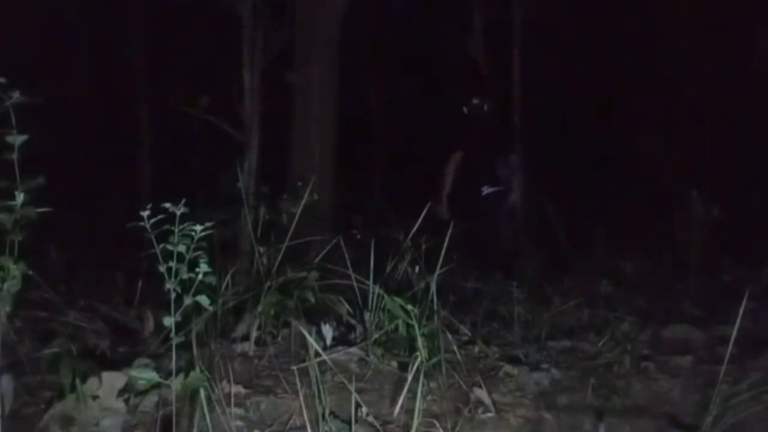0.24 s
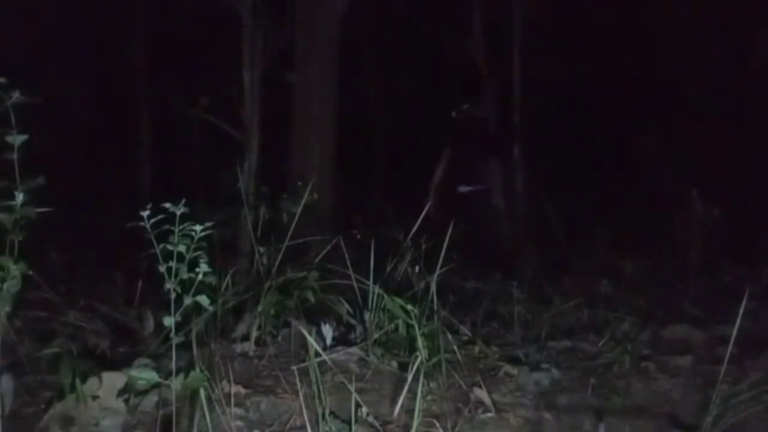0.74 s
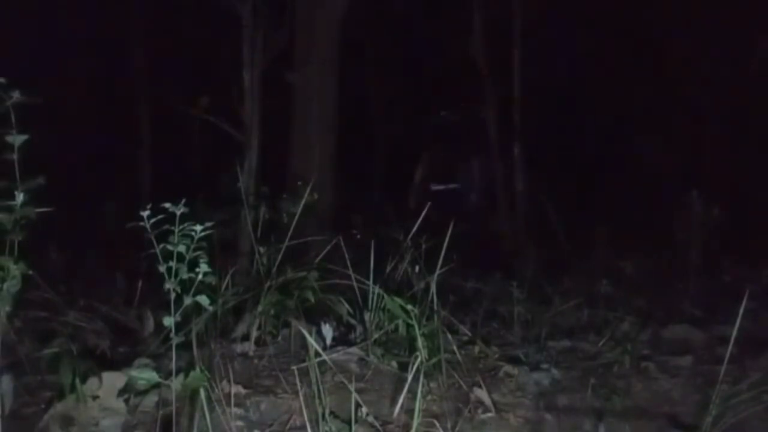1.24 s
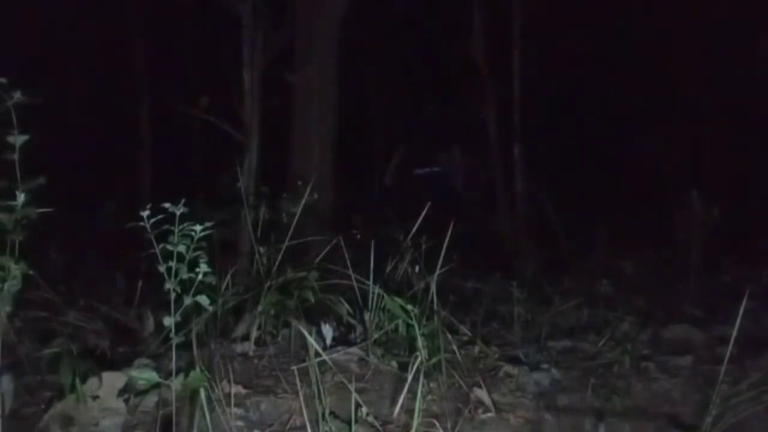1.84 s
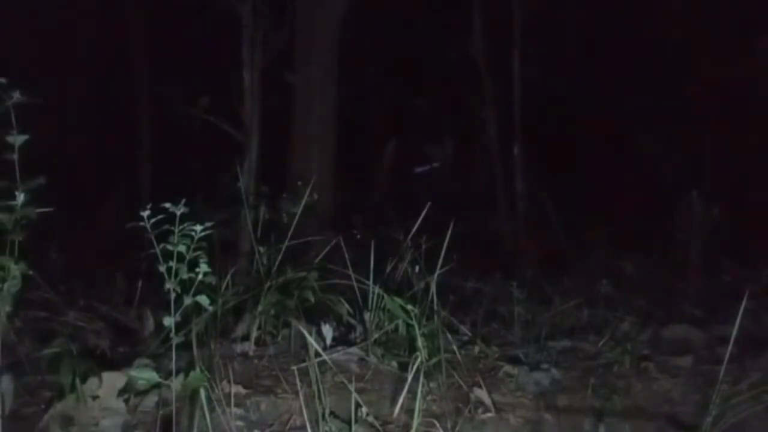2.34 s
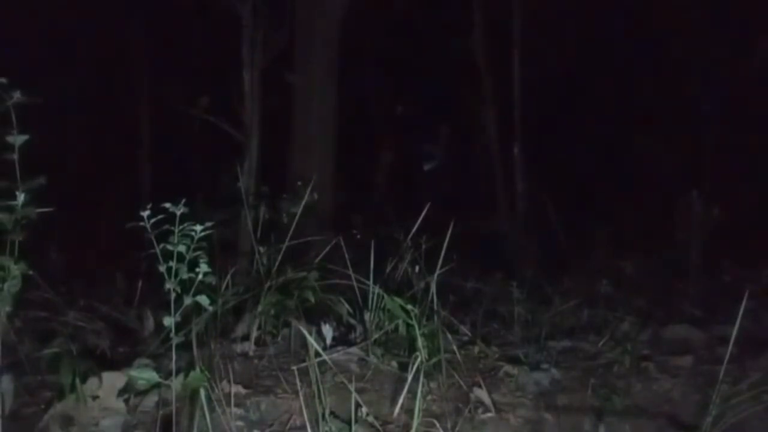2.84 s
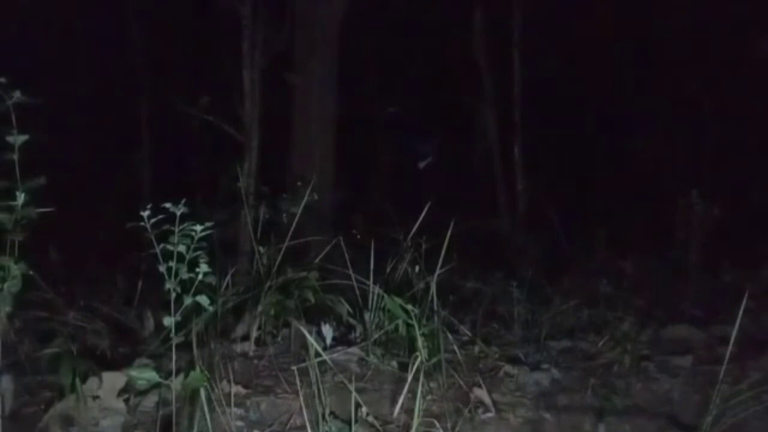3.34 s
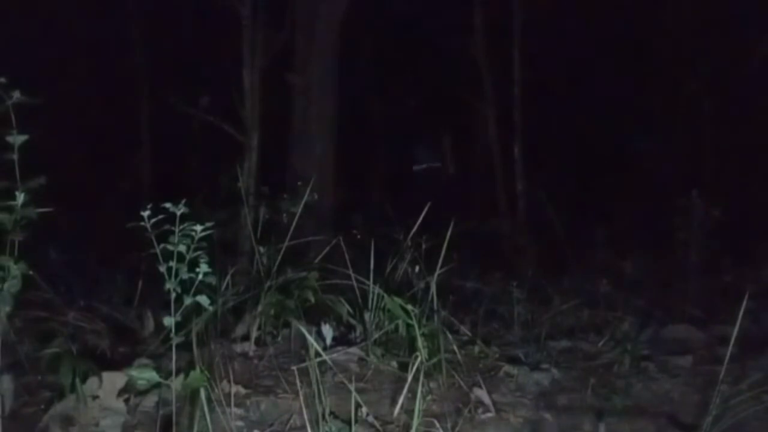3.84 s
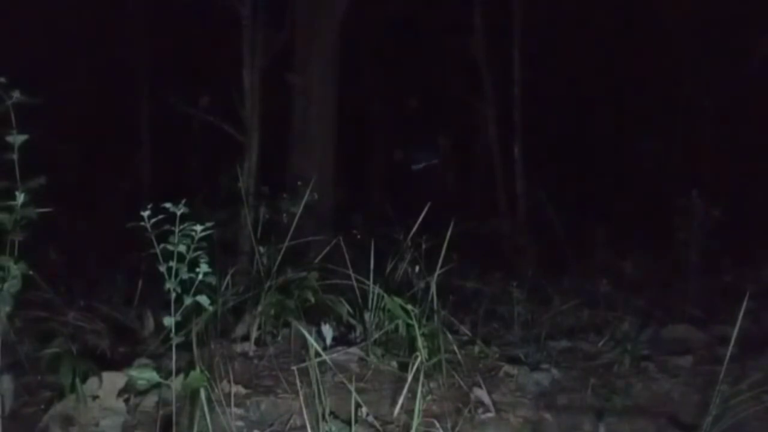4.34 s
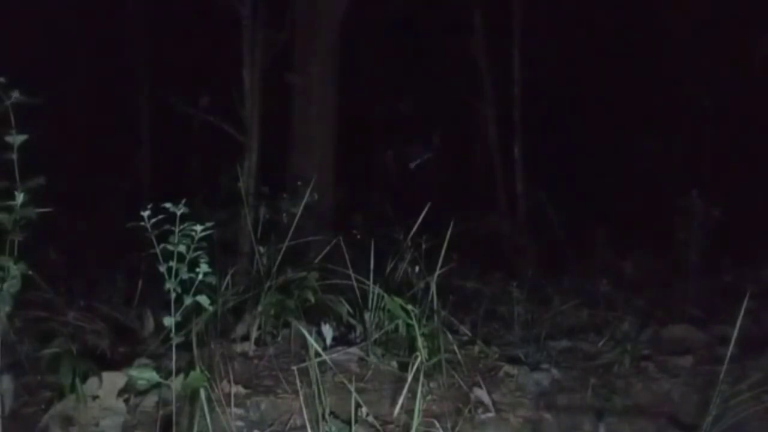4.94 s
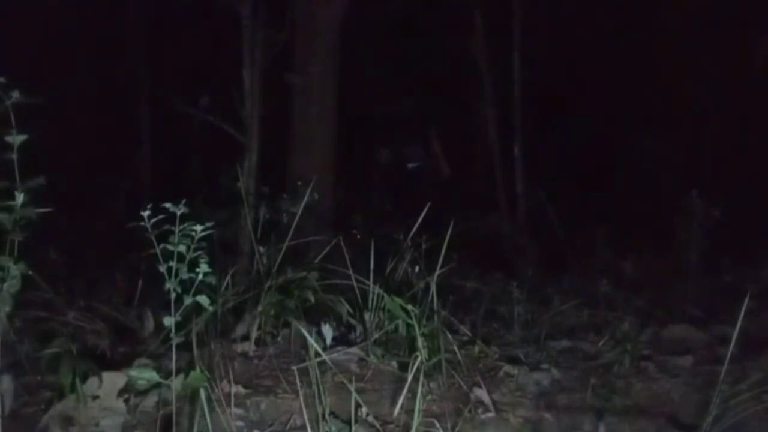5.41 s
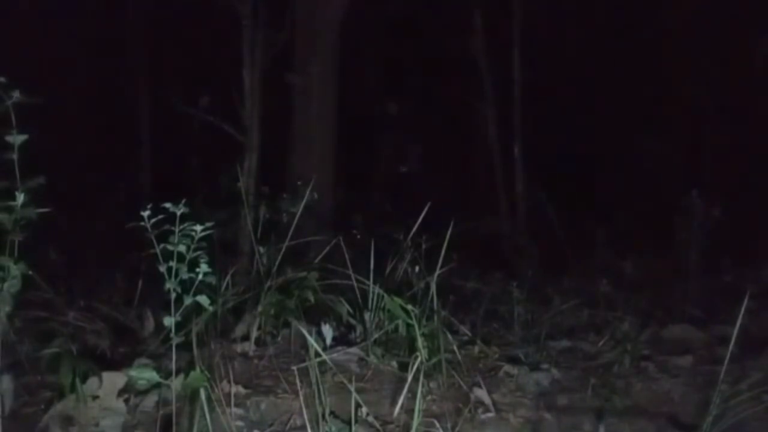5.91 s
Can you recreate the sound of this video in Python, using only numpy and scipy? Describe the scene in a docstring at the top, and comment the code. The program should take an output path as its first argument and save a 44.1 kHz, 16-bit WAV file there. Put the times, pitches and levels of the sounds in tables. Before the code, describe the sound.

High steady insect trilling among dark trees, interrupted mid-way by rough scuffing and sharp knocks of fingers shifting on a small plastic case.

```python
"""Night in a tree plantation: one near cricket trills in falling syllables, built from short gliding tones.
Behind it, far insects are repeated glides, thin steady notes and pulsing noise; faint calls are narrow noise.
A hand shifts on the camera: skin and cloth rub the case (rough noise), with knocks (ringing tones) and ticks.
A second cricket chirps twice, and something gives one faint rising whistle made of sliding tones.
The sound is mono, the same on both channels."""
import sys
import numpy as np
from scipy import signal
from scipy.fft import rfft, irfft, next_fast_len
from scipy.io import wavfile
from scipy.ndimage import uniform_filter1d, map_coordinates

SR = 44100
rng = np.random.default_rng(int(sys.argv[2]) if len(sys.argv) > 2 else 0)


def store_pcm(level_fs):
    """Save levels as 16-bit WAV."""
    pcm = np.round(np.clip(level_fs, -1, 1) * 32767).astype(np.int16)
    wavfile.write(sys.argv[1], SR, np.atleast_2d(pcm).T)


N = 272097  # length of the sound in samples


def amp(db):
    """Turn decibels into a multiplying gain."""
    return 10 ** (np.asarray(db) / 20)


def unit(x):
    """Scale a signal to an average strength (rms) of 1."""
    return x / np.sqrt(np.mean(x ** 2) + 1e-20)


def level_curve(points):
    """Join (time, level) points by straight lines, one value per sample."""
    times, levels = np.transpose(points)
    return np.interp(np.arange(N) / SR, times, levels)


def wobble(rate):
    """A smooth random curve through `rate` random points a second."""
    points = rng.standard_normal(int(N * rate / SR) + 4)
    return map_coordinates(points, [np.arange(N) * rate / SR])


def filtered(x, response):
    """Strengthen or weaken each frequency of a sound by response(frequency)."""
    size = next_fast_len(N + 8192)
    spectrum = rfft(x, size) * response(np.fft.rfftfreq(size, 1 / SR))
    return irfft(spectrum, size)[:N]


def coloured(x, colour):
    """Shape a sound by (frequency, level) points, then scale it to rms 1."""
    f, db = np.transpose(colour)
    return unit(filtered(x, lambda hz: amp(np.interp(np.log(hz + 1), np.log(f), db))))


def noise(colour):
    """Random noise has every frequency at once; the colour sets their balance."""
    return coloured(rng.standard_normal(N), colour)


def patchy(x, depth_db):
    """Make now one narrow band stand out, now another."""
    bands = signal.stft(x, nperseg=1024)[2]
    patches = uniform_filter1d(rng.standard_normal(bands.shape), size=4, axis=0)  # blur over pitch
    patches = uniform_filter1d(patches, size=5, axis=1)  # blur over time
    return signal.istft(bands * amp(depth_db * unit(patches)), nperseg=1024)[1][:N]


def add(track, s, sound):
    """Mix a sound into the track from time s, leaving out what lies beyond its ends."""
    start = round(s * SR)
    lo, hi = max(start, 0), min(start + len(sound), N)
    if hi > lo:
        track[lo:hi] += sound[lo - start:hi - start]


def forest(x, t60):
    """Many trunks scatter sound back as a dense echo that drops 60 dB in t60 seconds."""
    t = np.arange(SR // 2) / SR
    onset = 1 - np.exp(-t / 0.0054)
    tail = rng.standard_normal(len(t)) * amp(-60 * t / t60) * onset
    return signal.fftconvolve(x, tail / np.linalg.norm(tail))[:N]


def swells(rows, colour, gain_db):
    """Short soft-edged bursts of one colour of noise."""
    track, source = np.zeros(N), noise(colour)
    for s, length, db in rows:
        n = round(length * SR)
        burst = unit(np.hanning(n) * source[round(s * SR):][:n])
        add(track, s - length / 2, amp(db + gain_db) * burst)
    return track


def click(lo_hz, hi_hz, t60):
    """A short dying burst of noise in a band, with a peak of 1."""
    t = np.arange(SR // 20) / SR
    band = signal.butter(2, [lo_hz, min(hi_hz, SR / 2 - 1)], 'band', fs=SR, output='sos')
    burst = signal.sosfilt(band, rng.standard_normal(len(t)) * amp(-60 * t / t60))
    return burst / np.abs(burst).max()


def stroke(hz, fall_hz, length):
    """A soft-edged gliding tone; as wings close, the scraper slows along the file, so the pitch falls."""
    u = np.linspace(-.5, .5, max(int(length * SR), 8))  # place within the stroke
    phase = 2 * np.pi * (np.cumsum(hz - fall_hz * u) / SR + rng.random())
    return np.cos(np.pi * u) ** 2 * np.sin(phase)


def cricket(strokes, hz, fall_hz, length, scatter, gain_db, echo_db, t60):
    """One cricket rubs its wings: each stroke has a slightly different pitch and fall, plus a forest echo."""
    song = np.zeros(N)
    for s, db in strokes:
        stroke_hz = hz * (1 + scatter * rng.standard_normal())
        stroke_fall_hz = fall_hz * (1 + 0.1 * rng.standard_normal())
        add(song, s - length / 2, amp(db + gain_db) * stroke(stroke_hz, stroke_fall_hz, length))
    return song + amp(echo_db) * forest(song, t60)


def chorus(count):
    """Several far singers of each kind, out of step, each blurred by its own path through the trees."""
    # kinds of far insect: (middle pitch [Hz], middle fall within a stroke [Hz], stroke length [s],
    # middle stroke rate [1/s], level before its swell [dB])
    kinds = [(3580, 480, 0.02542, 21, -50), (4837, 750, .022, 26, -55), (6198, 1208, 0.01724, 31, -50.5)]
    # how the loudness of each kind changes, one curve per kind: (time [s], change [dB])
    kind_swells = [
        [(0,1),(1.4,3.5),(3.7,-6.5),(4.3,3.5),(5,-5),(6.17,1)],
        [(0,-1.5),(2,-0.5),(2.5,7.5),(3.5,-10.5),(4.3,-1),(5,-7)],
        [(0,0)],
    ]
    total = np.zeros(N)
    for (hz, fall_hz, length, rate, db), swell in zip(kinds, kind_swells):
        kind = np.zeros(N)
        for rank in np.linspace(-1, 1, count):
            song, pitch = np.zeros(N), hz * (1 + 0.02045 * rank)
            gaps = rng.normal(1, .1, size=256) / (rate * rng.uniform(.85, 1.15))
            for s in np.cumsum(gaps) - .3:
                if s < N / SR:
                    add(song, s, stroke(pitch * rng.normal(1, 0.0097), fall_hz, length))
            singer = song + 0.91 * forest(song, t60=0.3)
            kind += singer * amp(2.8 * wobble(10))
        total += amp(db + level_curve(swell)) * unit(kind)
    return total


def night():
    """The farthest insects merge into a gently pulsing noise over the soft noise of still air."""
    # colour of the merged far insects: (frequency [Hz], relative level per Hz [dB])
    hiss_colour = [(1500,-33.5),(2600,-11),(3000,-9),(3600,11.5),(4200,-2.5),(5200,3.5),(6500,3.5),(7700,1.5),(8200,5.5),(8700,-1),(9600,1.5),(10400,-8.5),(12000,-20),(15000,-37)]
    # colour of the still night air: (frequency [Hz], relative level per Hz [dB])
    air_colour = [(20,-6),(45,-10.5),(75,-2.5),(130,0),(250,-8),(500,-13),(1100,-17),(1700,-13.5),(2200,-18.5),(6000,-20.5),(15000,-21.5)]
    pulsing_db = -49.0 + 1.0 * wobble(11) + 0.27 * wobble(0.52)
    hiss = amp(pulsing_db) * unit(patchy(noise(hiss_colour), depth_db=3.0))
    air = amp(-67.5 + wobble(3.98)) * unit(patchy(noise(air_colour), depth_db=2.3))
    return hiss + air


def thin_notes():
    """Small insects sing without a break: faint, very high tones whose pitch and loudness waver."""
    # their notes: (middle pitch [Hz], level [dB])
    notes = [(8040,-68.5),(8200,-66.5)]
    waver_hz, flicker_db = 21.87, 3  # typical sizes of the random changes
    song = np.zeros(N)
    for hz, db in notes:
        phase = 2 * np.pi * np.cumsum(hz + waver_hz * wobble(40)) / SR
        note = amp(flicker_db * wobble(9)) * forest(np.sin(phase), t60=0.17)
        song += amp(db) * unit(note)
    return song


def far_calls():
    """Something far off calls faintly: soft bursts of noise in one narrow band."""
    # the calls: (middle [s], length [s], level before the gain [dB])
    calls = [(.09,0.056,-65.5),(.55,0.23,-69.5),(1.3,0.33,-64.5)]
    # their colour: (frequency [Hz], relative level per Hz [dB])
    call_colour = [(1250,-24),(1650,-6.5),(2200,-17)]
    return swells(calls, call_colour, gain_db=3.0)


def trill():
    """Wing strokes (time, level) of the near cricket: even within a run, fading faster in the slow gait."""
    # runs of strokes, each lasting until the next begins: (start [s], gait, relative starting level [dB])
    runs = [(.150,"brisk",-43.5),(.560,"slow",-44),(.762,"brisk",-46.5),(.929,"slow",-45.5),(1.257,"brisk",-44.5),(1.756,"slow",-42.5),(2.197,"brisk",-58),(2.960,"brisk",-44.5),(3.368,"slow",-42),(3.927,"brisk",-43.5),(4.425,"slow",-44),(5.112,"brisk",-45),(5.559,"slow",-43)]
    # each gait by name: (approximate time between strokes [s], fading through a run [dB/s])
    gaits = {"brisk": (.045, 1), "slow": (.063, 12)}
    last_end_s, scatter_db = 6.19, 1.0
    strokes, ends = [], [run[0] for run in runs[1:]] + [last_end_s]
    for (start, gait, db), end in zip(runs, ends):
        gap, fade = gaits[gait]
        count = round((end - start) / gap)
        for s in np.linspace(start, end, count, endpoint=False):
            strokes.append((s, db - fade * (s - start) + scatter_db * rng.standard_normal()))
    return strokes


def friction():
    """Strength of scrape and fizz: every stroke of the hand swells to a peak and dies away."""
    # strokes of the hand over the case: (firmest moment [s], rise [s], release [s],
    # relative scrape level [dB], relative fizz level above that [dB])
    rubs = [(1.2,0.045,.22,-66.5,7.5),(1.37,0.12,.16,-57.5,3),(1.948,0.054,0.051,-63,9.5),(2.32,0.032,0.063,-56.5,-5),(2.572,0.0072,0.043,-39.5,-20),(2.643,0.068,0.31,-36,-8.5),(2.774,0.0097,0.013,-34.5,-14),(2.88,0.13,0.083,-43.5,-8),(3.0,0.14,0.23,-36.5,-7.5),(3.24,0.28,0.38,-48,-7.5),(3.462,0.14,0.19,-66.5,7.5),(3.728,0.12,.07,-53,2),(4.476,.02,0.058,-43,-6),(4.573,0.12,0.31,-40,-8),(4.841,0.13,0.37,-44,-6.5),(5.01,0.18,.27,-46,-6.5),(5.251,0.26,0.045,-53,-9),(5.38,.06,0.066,-67,-1)]
    fade_db = 22.5  # gained over the rise, lost over the release
    t, power = np.arange(N) / SR, np.zeros((2, N))
    for s, rise, release, db, fizz_db in rubs:
        away = np.maximum((s - t) / rise, (t - s) / release)
        shape = amp(-fade_db * np.minimum(away, 10))
        power += np.outer(amp([db, db + fizz_db]), shape) ** 2
    return np.sqrt(power)


def rubbing(scrape, fizz, grain_db, flutter_db, snag_db):
    """Friction is a dense run of tiny slips that catch and release, with a few harder snags."""
    # colour of the scrape: (frequency [Hz], relative level per Hz [dB])
    scrape_colour = [(90,-7),(230,-13),(360,-2.5),(520,-4.5),(700,-3.5),(1300,0),(1700,2.5),(3200,1.5),(4400,-11.5),(5600,-7.5),(7000,-1.5),(9000,-6.5),(11000,-24)]
    # colour of the bright fizz: (frequency [Hz], relative level per Hz [dB])
    fizz_colour = [(1500,-17),(3500,3),(5200,1),(6600,6),(8300,6.5),(9400,-3),(10600,-4),(11600,-9.5),(12200,0),(13500,-0.5),(15000,-3)]
    catch = amp(flutter_db * wobble(130))
    snag_happens = rng.random(N) < 170 / SR  # about 170 a second
    snags = amp(snag_db) * unit(snag_happens * rng.uniform(-1.2, 1, N))
    grains = rng.standard_normal(N) * amp(grain_db * wobble(1500))
    slips = patchy(grains + snags, depth_db=2)
    crackle = patchy(rng.standard_normal(N) * amp(0.64 * wobble(700)), depth_db=2.0)
    body = scrape * amp(3) * coloured(slips * catch, scrape_colour)
    top = fizz * amp(11.5) * coloured(crackle * np.sqrt(catch), fizz_colour)
    return body + top


def finger_slips(scrape):
    """Fingers slip and tap the case at random moments, harder the firmer the stroke."""
    slips_per_s = 55
    least_db, spread_db = 3, 2.8  # click peak against the scrape strength; the spread makes some harder
    track = np.zeros(N)
    for place, chance in rng.random((round(slips_per_s * N / SR), 2)):
        i = int(place * N)
        peak = scrape[i] * amp(least_db - spread_db * np.log(chance + .02))
        add(track, i / SR, peak * click(377, 5500, t60=0.0096))
    return track


def chirps():
    """Wing strokes (time, level) of the second cricket: each in a chirp is louder than the one before."""
    # its chirps: (last stroke [s], strokes before it [count], relative level of the last stroke [dB])
    chirp_rows = [(1.512,3,-41.5),(1.770,2,-43.5)]
    gap_s, growth_db = .039, 3.5  # from one stroke to the next
    strokes = []
    for s, before, db in chirp_rows:
        for k in range(round(before) + 1):  # count back from the last stroke
            strokes.append((s - k * gap_s, db - k * growth_db))
    return strokes


def whistle():
    """A faint pure tone in pieces that each slide upward, echoing among the trees."""
    # pieces of the whistle: (middle [s], length [s], pitch at the middle [Hz], level before flutter [dB])
    pieces = [(2.01,0.056,1182,-63),(2.064,0.097,748,-62),(2.117,.08,975,-54)]
    rise_hz_per_s = 4200
    tone = np.zeros(N)
    for s, length, hz, db in pieces:
        add(tone, s - length / 2, amp(db) * stroke(hz, -rise_hz_per_s * length, length))
    tone = tone * amp(2 * wobble(81))
    return tone + amp(-4) * forest(tone, t60=0.2)


def knocks(lowest_hz):
    """Contacts ring the well-damped plastic case and tick on its surface; a soft pad is duller than a nail."""
    # finger contacts: (time [s], knock peak [dB], dulled above [Hz], sharp tick peak [dB], tick t60 [s])
    contacts = [(2.321,-47,4000,-19,.006),(2.568,-22,3000,-26.5,.02),(2.582,-27,2000,-28,.02),(2.641,-23,4000,-43,.02),(2.717,-27,4000,-24,0.017),(2.772,-27,5000,-30,.02),(2.916,-14,3220,-24,0.048),(3.130,-27.5,4000,-19,0.019),(3.140,-28.5,714,-26,.02),(3.185,-27.5,1500,-40,.02),(3.195,-28.5,1510,-43,.02),(3.249,-31,520,-57,.02),(3.322,-37,515,-58,.02),(4.486,-29,1800,-42,.02),(4.740,-24,1410,-25,0.039),(4.819,-31,2500,-39,.02)]
    # ringing tones of the case: (middle pitch [Hz], relative level [dB], t60 [s])
    case_tones = [(752,-7,0.023),(1237,6,0.0037),(1560,6.5,0.0074),(2560,-12,0.0071)]
    # thin bright clicks: (time [s], relative level [dB])
    snaps = [(4.3932,-22),(4.3984,-17.5)]
    track, t = np.zeros(N), np.arange(SR // 20) / SR
    small_case = signal.butter(3, lowest_hz, 'high', fs=SR, output='sos')  # a small shell radiates little bass
    for s, knock_db, dull_hz, tick_db, tick_t60 in contacts:
        ring = np.zeros(len(t))
        for hz, db, t60 in case_tones:
            tone_hz = hz * (1 + 0.018 * rng.standard_normal())
            ring += amp(db - 60 * t / t60) * np.sin(2 * np.pi * tone_hz * t)
        ring = signal.sosfilt(small_case, ring)
        thud = ring / np.abs(ring).max() + 0.29 * click(380, 2700, t60=0.088)
        pad = signal.butter(2, dull_hz, fs=SR, output='sos')
        knock = signal.sosfilt(pad, thud)
        add(track, s, amp(knock_db) * knock / np.abs(knock).max())
        add(track, s, amp(tick_db) * click(4350, 8900, t60=tick_t60))
    for s, db in snaps:
        snap = click(8500, 23000, t60=.006) + .05 * click(8500, 15000, t60=0.052)
        add(track, s, amp(db) * snap)
    return track


def pressing():
    """The grip presses on the case in dull bumps: soft bursts of low noise."""
    # the presses: (middle [s], length [s], level before the gain [dB])
    presses = [(2.61,0.14,-42.5),(2.685,0.16,-53),(2.937,0.16,-42),(3.036,0.088,-49.5),(3.191,0.075,-46),(4.53,0.15,-46.5),(4.787,0.11,-54),(5.44,.08,-62.5)]
    # their colour: (frequency [Hz], relative level per Hz [dB])
    rumble_colour = [(35,-43.5),(62,-5),(85,6),(150,1),(230,-2.5),(500,-20)]
    return swells(presses, rumble_colour, gain_db=-4.5)


def scene():
    """Insects and handling add up at one microphone."""
    near = cricket(trill(), hz=3570, fall_hz=688, length=.031, scatter=0.0076,
                   gain_db=3.5, echo_db=-9.5, t60=0.55)
    second = cricket(chirps(), hz=4595, fall_hz=765, length=0.031, scatter=.004,
                     gain_db=6.5, echo_db=-8.5, t60=0.077)
    far = chorus(count=4) + night() + thin_notes() + far_calls() + whistle()
    scrape, fizz = friction()
    hand = rubbing(scrape, fizz, grain_db=2, flutter_db=1.84, snag_db=-8.5) + pressing()
    taps = knocks(lowest_hz=673) + finger_slips(scrape)
    mono = near + second + far + hand + taps
    return np.array([mono, mono])


def record(dry):
    """The camera cuts the deep bass and keeps nothing above its band limit."""
    bass_cut_hz, top_hz = 55, 15100
    thin = signal.sosfilt(signal.butter(4, bass_cut_hz, 'high', fs=SR, output='sos'), dry)
    return np.array([filtered(channel, lambda hz: hz < top_hz) for channel in thin])


dry = scene()
out = record(dry)
store_pcm(out)
```